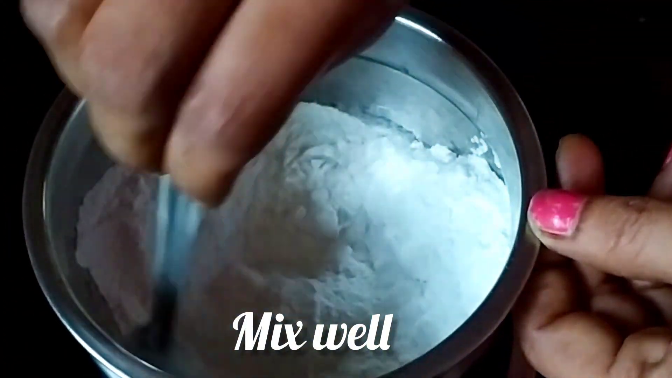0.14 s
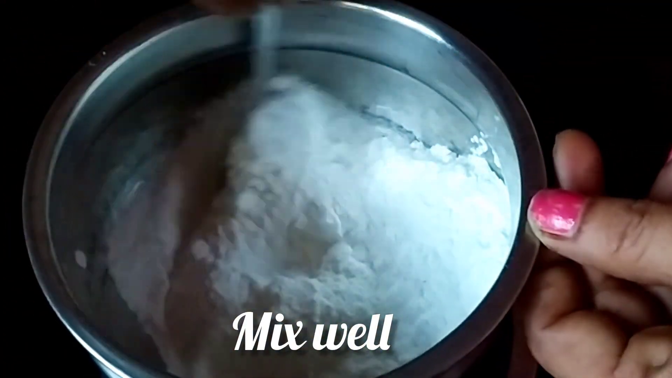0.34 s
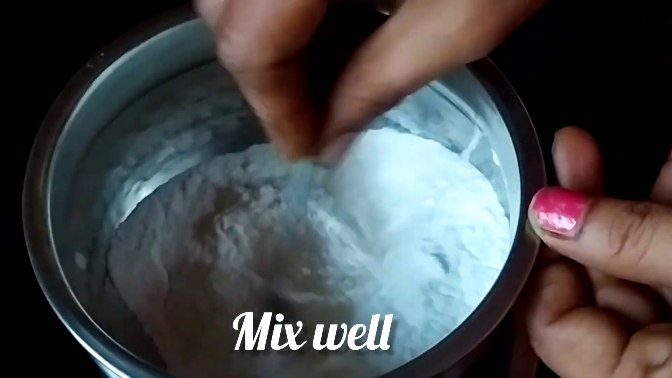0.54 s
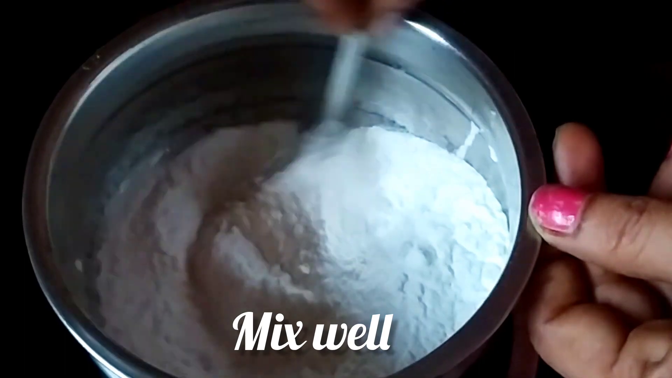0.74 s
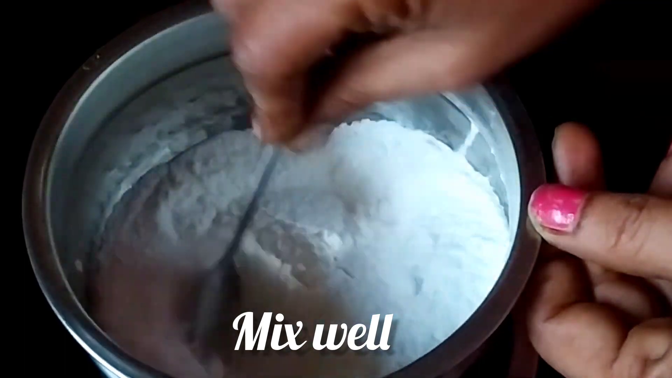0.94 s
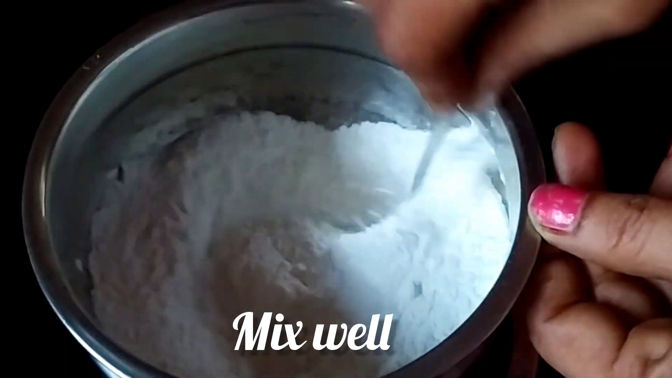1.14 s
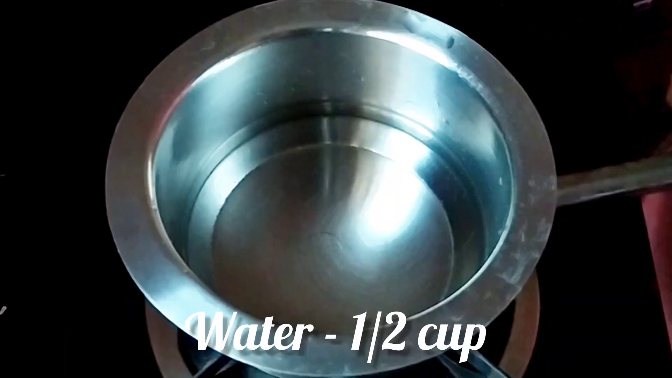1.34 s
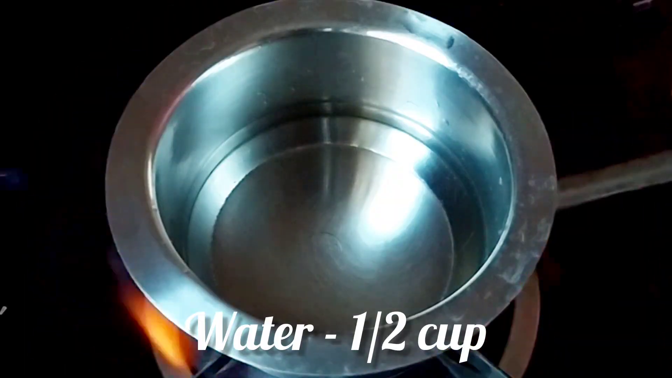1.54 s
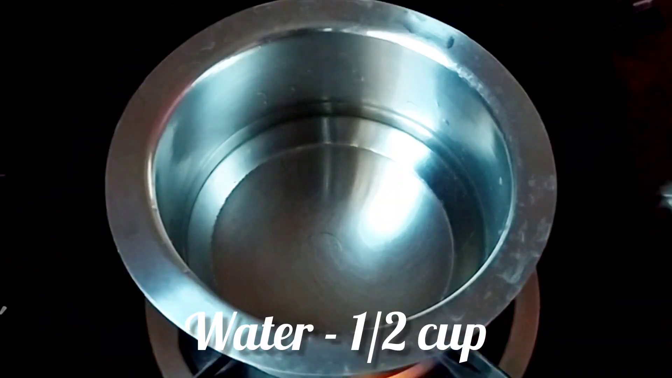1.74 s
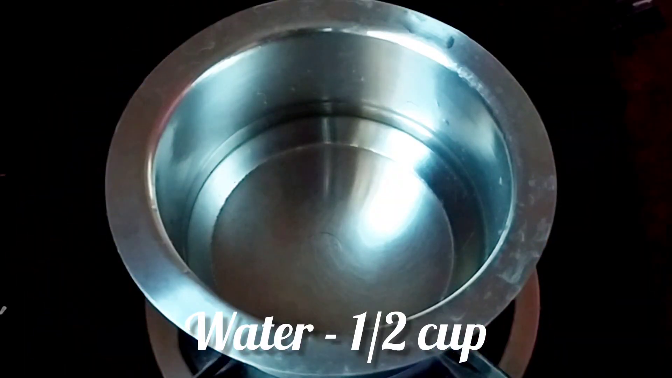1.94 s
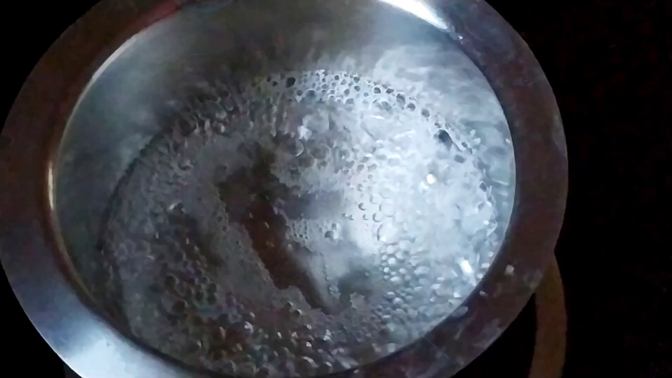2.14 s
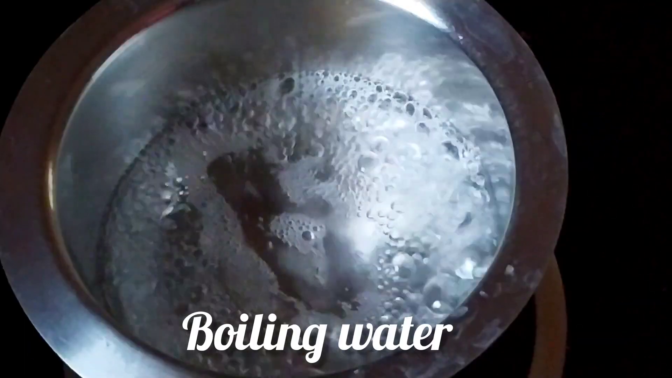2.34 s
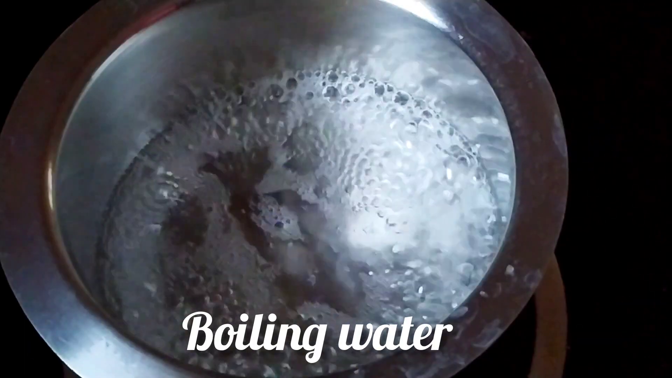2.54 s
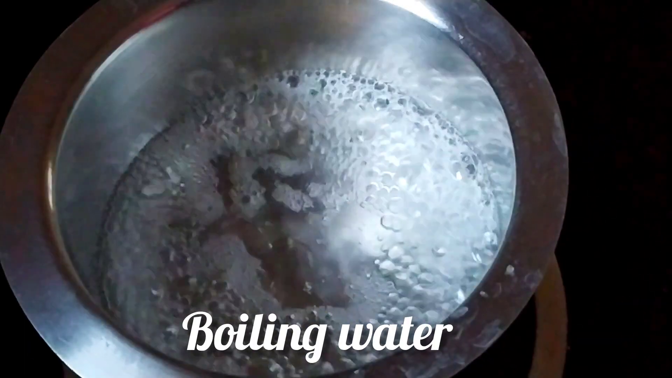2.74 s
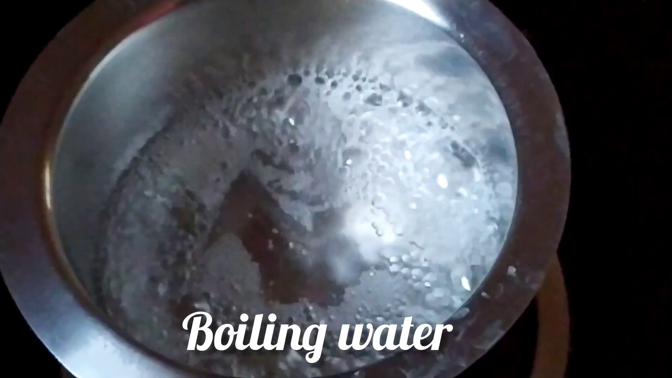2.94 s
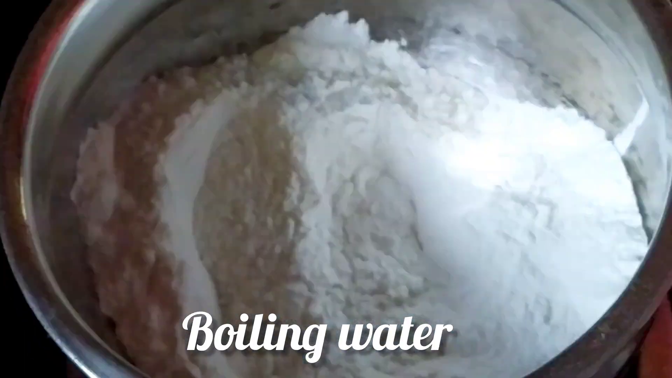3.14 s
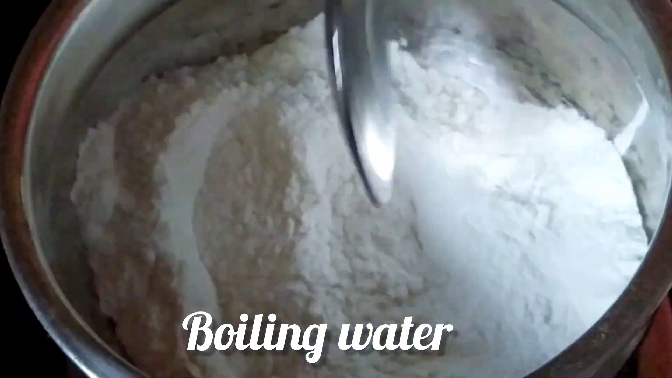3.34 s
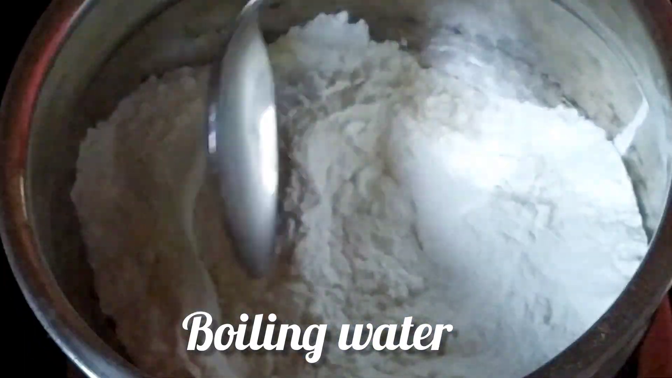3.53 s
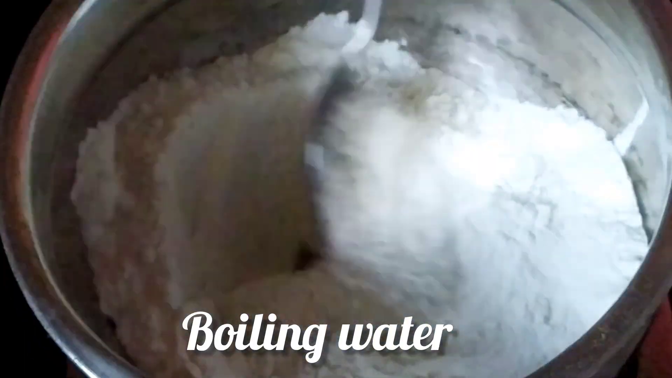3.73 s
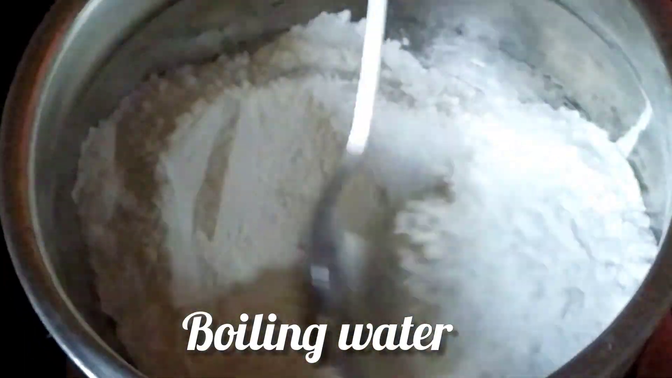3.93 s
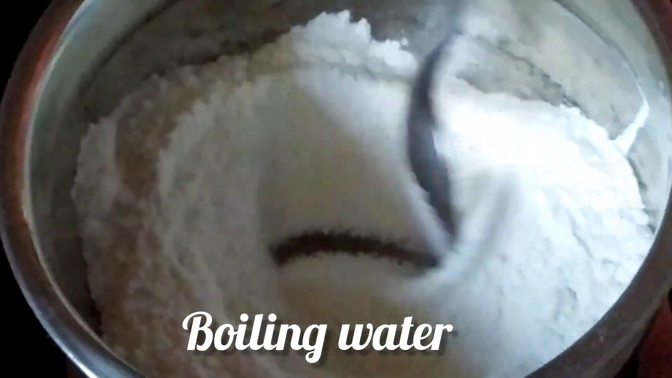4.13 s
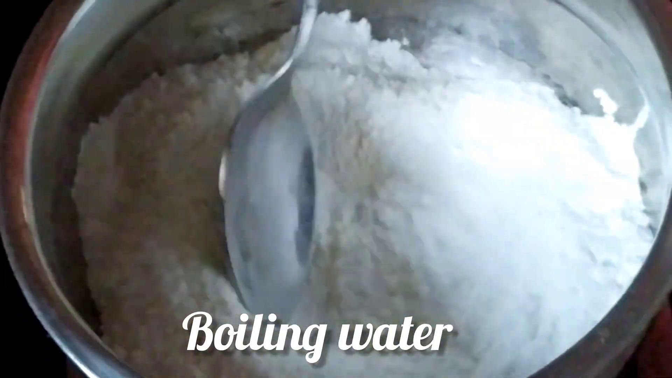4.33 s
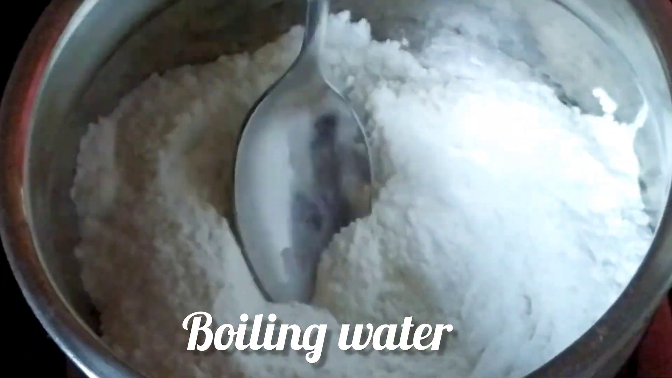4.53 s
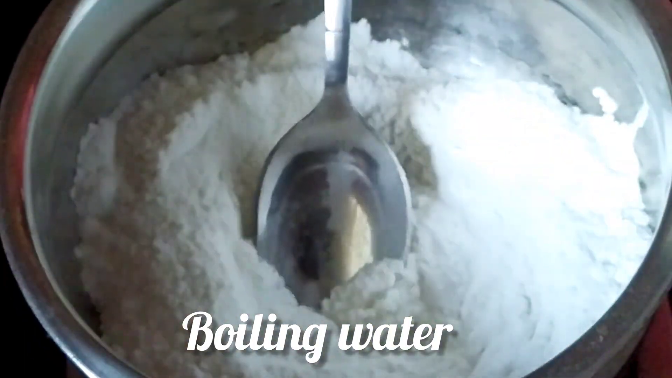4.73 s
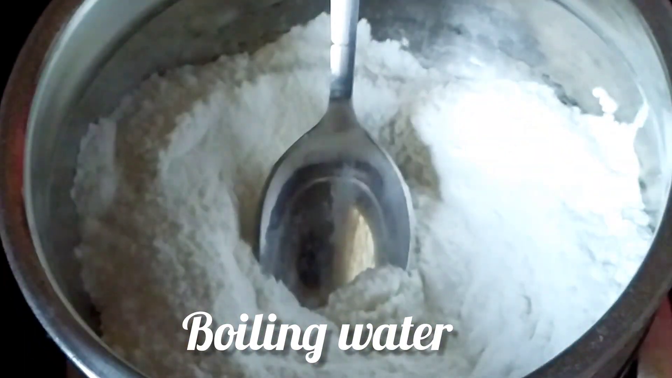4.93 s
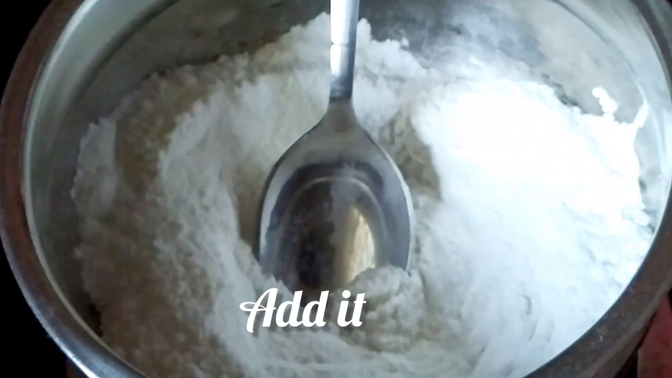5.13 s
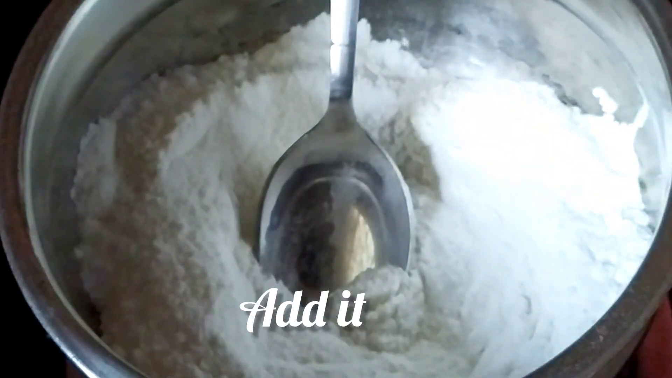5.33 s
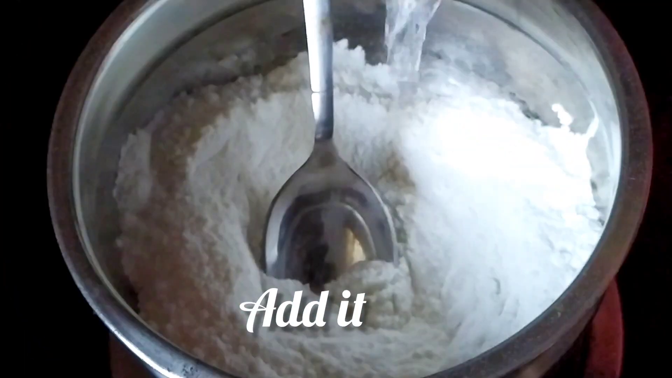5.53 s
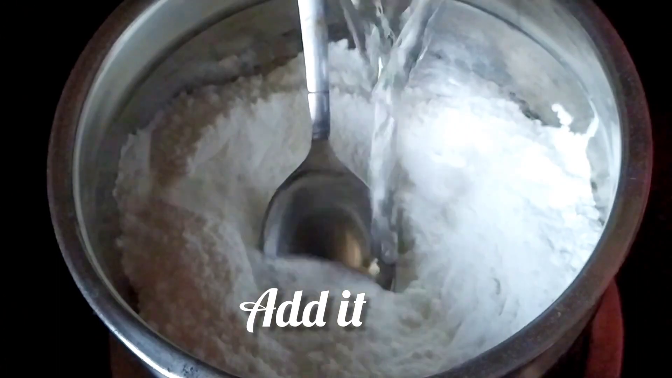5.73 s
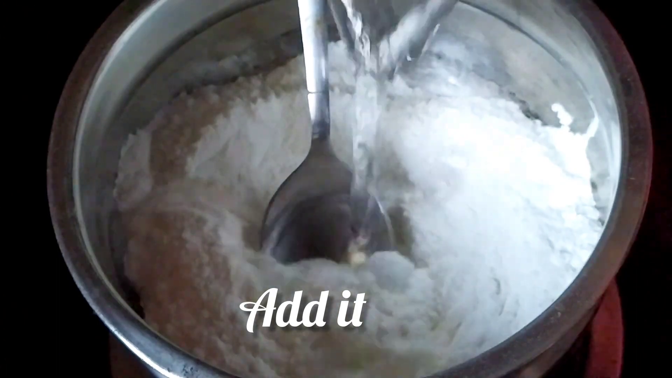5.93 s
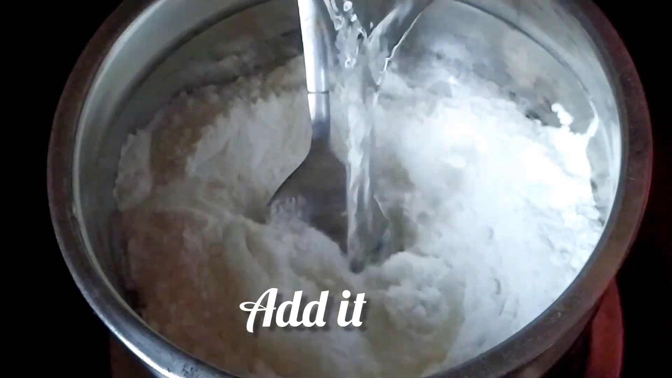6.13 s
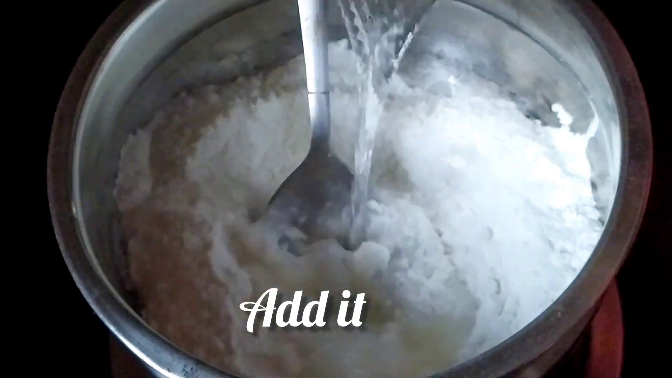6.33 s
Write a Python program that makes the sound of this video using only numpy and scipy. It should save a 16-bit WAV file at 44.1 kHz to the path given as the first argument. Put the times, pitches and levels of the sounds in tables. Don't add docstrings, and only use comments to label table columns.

```python
import sys
import numpy as np
from scipy import signal
from scipy.fft import rfft, irfft, next_fast_len
from scipy.io import wavfile
from scipy.ndimage import uniform_filter1d, minimum_filter1d

SR = 44100
rng = np.random.default_rng(int(sys.argv[2]) if len(sys.argv) > 2 else 0)


def rack_gain(trim_db):
    fader = np.asarray(trim_db, float)
    return 10 ** (fader / 20)


def waveform_to_disk(signal):
    frames = np.transpose(np.atleast_2d(signal))
    scaled = np.clip(frames, -1, 1) * 32767
    samples = np.round(scaled).astype(np.int16)
    wavfile.write(sys.argv[1], SR, samples)


N = 280917
SIZE = next_fast_len(N, True)
TIME = np.arange(N) / SR
FREQ = np.fft.rfftfreq(SIZE, 1 / SR) + 1
SIDES = np.array([[1], [-1]])
ALIKE_HZ = 890

# start/s, end/s, hiss/dB, air/dB, rumble/dB
SHOTS = [
    (0, 1.361, -57.5, -67, -66.5),
    (1.361, 2.1963, -59.5, -62.5, -53.5),
    (2.482, 3.038, -65, -69.5, -96),
    (3.145, 5.492, -56.5, -68.5, -68),
    (5.496, 6.383, -55.5, -67, -69.5),
]


def shot_gate(start_s, end_s):
    return uniform_filter1d(1. * ((TIME >= start_s) & (TIME < end_s)), size=60)


def unit(x):
    return x / np.sqrt(np.mean(x ** 2))


def slope(points):
    hz, db = np.transpose(points)
    return rack_gain(np.interp(np.log(FREQ), np.log(hz), db, left=-90, right=-90))


def humps(rows):
    return np.sqrt(sum(rack_gain(2 * db) / (1 + (2 * (FREQ - hz) / width_hz) ** 2) for hz, width_hz, db in rows))


def noise(gain, grains=0, spread_db=0):
    mid, side = rng.standard_normal((2, SIZE))
    if grains:
        grain_db = spread_db * rng.standard_normal(30000)
        size = rack_gain(grain_db[(np.arange(SIZE) * grains / SR).astype(int)])
        mid, side = mid * size, side * size
    unlike = FREQ / np.hypot(FREQ, ALIKE_HZ)
    spectrum = gain * (rfft(mid) + SIDES * unlike * rfft(side))
    return unit(irfft(spectrum, SIZE)[:, :N])


def ring(modes, scatter_db, scale=1., push_s=0.000083):
    hz, db, t60_s = np.transpose(modes)[:, :, None, None]
    t = TIME[:int(min(t60_s.max() * scale, .5) * SR)]
    blow = rng.standard_normal((len(modes), 1, 1))
    port_size, port_phase = rng.standard_normal((2, len(modes), 2, 1))
    unlike = np.minimum(hz / (3 * ALIKE_HZ), 1)
    level = rack_gain(db + scatter_db * (blow + unlike * port_size))
    longest_s = 0.86 + 0.13 * (hz < 4000)
    decay = np.exp(-np.log(1000) * t / (np.minimum(t60_s, longest_s) * scale))
    y = np.sum(level * decay * np.sin(2 * np.pi * hz * t + 2 * unlike * port_phase), axis=0)
    y = y * (1 - np.exp(-t / push_s))
    return y / np.abs(y).max()


def burst(source, s, t60_s):
    i = int(s * SR)
    piece = source[:, i:i + int(t60_s * SR)]
    return piece * np.exp(-np.log(1000) * TIME[:piece.shape[1]] / t60_s) / 3


def add(out, s, y, db, pan_db=0):
    i = int(s * SR)
    for part in y if isinstance(y, tuple) else (y,):
        out[:, i:i + part.shape[1]] += part * rack_gain(db + SIDES * pan_db / 2)


def tilt(modes, hard_db, pivot_hz):
    return [(hz, db + hard_db * np.log2(hz / pivot_hz), t60_s) for hz, db, t60_s in modes]


def swell(s, hold_s, rise_s, fall_db_s, bite_db=0):
    t = TIME[::16] - s
    climb_db = bite_db * (np.clip(t / max(hold_s, .001), 0, 1) - 1)
    fall_db = fall_db_s * np.clip(t - rise_s - hold_s, 0, None)
    gain = np.clip(t / rise_s, 0, 1) * rack_gain(climb_db - fall_db)
    return np.repeat(gain, 16)[:N]


def layers(rows, rise_s, fall_db_s, bite_db=0):
    power = 0
    for s, hold_s, *db in rows:
        power = power + (rack_gain(db)[:, None] * swell(s, hold_s, rise_s, fall_db_s, bite_db)) ** 2
    return np.sqrt(power)


def mains_hum():
    wobble = unit(uniform_filter1d(rng.standard_normal(N), size=2000))
    tone = np.sqrt(2) * np.sin(2 * np.pi * 300.9 * TIME + 0.36 * SIDES)
    return rack_gain(-64.5 + 0.33 * wobble) * tone * rack_gain(0.8 * SIDES)


# f/Hz, width/Hz, level/dB
HISS_BANDS = [(6394, 380, 3), (7346, 540, 5), (7990, 500, -1), (9720, 740, -1.5)]


def thin_hiss():
    return noise(humps(HISS_BANDS) ** 2) * rack_gain(-1.5 * SIDES)


# f/Hz, density/dB per Hz
AIR_SLOPE = [(82, -67.5), (140, -14), (242, -15), (300, -11.5), (351, -17.5), (3060, -35), (3520, -35.5),
             (4590, -34.5), (5540, -37.5), (5800, -41), (7540, -58.5), (12800, -120)]


def room_air():
    return noise(slope(AIR_SLOPE + [(12000, -39.0), (16000, -51.5)]))


# f/Hz, density/dB per Hz
RUMBLE_SLOPE = [(15, 9), (25, -24), (60, -17.5), (130, -25.5), (150, -29.5)]


def far_rumble():
    draught = noise(slope(RUMBLE_SLOPE))[0]
    return noise(slope(RUMBLE_SLOPE)) + 0.3 * SIDES * draught


def walls(x):
    t60_s, level_db = 0.24, -7
    t = TIME[:int(.5 * SR)]
    echo = noise(np.ones(len(FREQ)))[:, :len(t)]
    dull = uniform_filter1d(echo, size=9)
    tail = dull + (echo - dull) * np.exp(-t / 0.024)
    tail = tail * np.exp(-np.log(1000) * t / t60_s) * np.clip(t / 0.0016 - .5, 0, 1)
    tail = tail / np.sqrt(np.sum(tail ** 2, axis=1, keepdims=True))
    return rack_gain(level_db) * signal.fftconvolve(x, tail, axes=1)[:, :N]


# f/Hz, density/dB per Hz
SIMMER_SLOPE = [(190, -52), (330, -34), (398, 10.5), (431, -10.5), (758, -4.5), (989, -1.5), (1660, -14),
                (2780, -8.5), (3630, -15.5), (7480, -11.5), (9760, -24), (10600, -22.5), (14000, -53.5)]


def simmer():
    pan_wall = 1 + rack_gain(-1.0) * humps([(2784, 56, 0.0026)])
    bubbles = noise(slope(SIMMER_SLOPE) * pan_wall, grains=320, spread_db=2.0)
    return rack_gain(-63.5) * bubbles * (TIME > SHOTS[1][1]) * (TIME < SHOTS[3][0])


# f/Hz, density/dB per Hz
GRIT_SLOPE = [(3410, -50), (5800, -16.5), (9590, 0), (10600, -5.5), (11500, -11.5), (12400, -12),
              (13800, -18.5), (14800, -13.5), (16400, -38.5)]
# f/Hz, density/dB per Hz
SPLASH_SLOPE = [(210, -46), (350, -29), (804, -1), (1120, -14), (1410, -7), (3390, -10.5), (5020, -8),
                (5590, -11), (6000, -17), (7800, -39), (13200, -120)]
# t/s, hold/s, splash/dB, spray/dB, fall/dB per s
GUSHES = [
    (5.118, 0.22, -69.5, -64, 125),
    (5.497, 0.075, -58.5, -52, 54.5),
    (5.983, 0.081, -64.5, -55, 106),
]
# t/s, level/dB
BUBBLE_POPS = [
    (2.6332, -51),
    (2.7025, -54),
    (2.7663, -49),
]


def pour_and_pops():
    splash, mist = sum(layers([row], 0.0059, fall_db_s) for *row, fall_db_s in GUSHES)
    spray = noise(slope(GRIT_SLOPE), grains=1600, spread_db=2.5)
    out = splash * noise(slope(SPLASH_SLOPE), grains=570, spread_db=2.0) + mist * spray
    for s, db in BUBBLE_POPS:
        add(out, s, burst(spray, s, 0.037), db)
    return out


SPARK_S, CATCH_S, LAID_S = 1.51, 1.514, 2.056
# f/Hz, density/dB per Hz
ROAR_SLOPE = [(160, -36.5), (280, -12), (472, -2), (518, -14), (864, -5.5), (927, -10), (1090, -4.5),
              (1530, -14.5), (2110, -10.5), (4500, -18), (5850, -39.5), (9900, -120)]
# f/Hz, density/dB per Hz
JET_SLOPE = [(1760, -8.5), (3000, -7.5), (5000, -2), (5260, -5), (5720, 1), (6190, 1), (10900, 5.5),
             (12000, -8), (16000, -14), (16400, -41)]
# roar/dB, hiss/dB, boom/dB, fall/dB per s
FLARE_STAGES = [
    (-39.5, -29.5, -60.5, 212),
    (-44, -43.5, -47, 86.5),
    (-54.5, -66, -56, 4),
]
# f/Hz, width/Hz, level/dB
KNOB_MODES = [(316.6, 37, -0.5), (585, 26, -14), (1070, 290, 0), (1310, 35, -7), (1570, 25, -4),
              (1990, 19, -10.5), (2240, 330, -3), (3280, 24, -9)]
# f/Hz, width/Hz, level/dB
GRATE_MODES = [(368, 29, 11), (468, 40, -1), (770, 74, 3), (953, 53, 0.5), (1092, 18, 2.5),
               (2260, 21, -1.5), (2340, 31, -14.5), (2470, 40, -9), (2730, 310, -7.5), (2990, 30, 4),
               (3220, 29, -12)]
# f/Hz, width/Hz, level/dB
LIGHTER_MODES = [(4160, 37, -21), (5030, 56, -21), (5460, 92, -24), (6590, 47, -20), (7290, 81, -13),
                 (8750, 30, 0), (9430, 77, -12), (9930, 45, -14), (10150, 200, -16), (11700, 250, -21),
                 (12700, 300, -18), (13300, 60, -20), (14200, 300, -23), (15060, 35, -13)]
# t/s, hold/s, low/dB, high/dB, boom/dB
HANDLING_EVENTS = [
    (1.36, 0.0097, -47, -45, -54),
    (1.381, 0.042, -38, -54.5, -65),
    (2.062, 0.034, -38, -33.5, -46),
    (2.163, .004, -36.5, -46.5, -62),
    (2.174, .026, -30.5, -36, -57),
]


def knob_flame_and_drag():
    low, high, thump = layers(HANDLING_EVENTS, 0.0035, 141)
    rush, hiss, boom = sum(layers([(CATCH_S, 0, *db)], 0.0079, fall_db_s) for *db, fall_db_s in FLARE_STAGES)
    knob = noise(humps(KNOB_MODES), grains=300, spread_db=2.0)
    grate = noise(humps(GRATE_MODES) ** .6, grains=500, spread_db=2.5)
    lighter = noise(humps(LIGHTER_MODES) ** .85 * (FREQ < 15250), grains=300, spread_db=2.0)
    roar = noise(slope(ROAR_SLOPE), grains=220, spread_db=0.5)
    jet = noise(slope(JET_SLOPE), grains=1000, spread_db=2.0)
    flutter = rack_gain(-49) * swell(CATCH_S, hold_s=0.17, rise_s=.1, fall_db_s=117)
    flame = rack_gain(-1.0) * flutter * noise(humps([(24.4, 13, 0)]) ** 2)
    boom = boom * swell(CATCH_S, hold_s=9, rise_s=0.028, fall_db_s=0) + thump
    flame += rack_gain(-4.0) * boom * noise(humps([(83.5, 49, -13.5), (165, 23, -9.5)]) ** 2)
    laid = TIME > LAID_S
    low_rub = low * np.where(laid, grate, knob * (TIME < SPARK_S))
    high_rub = high * np.where(laid, lighter, jet)
    out = rack_gain(-2.5) * (low_rub + rush * roar) + high_rub + hiss * jet + flame
    return out * (TIME < SHOTS[1][1])


# f/Hz, density/dB per Hz
SNAP_SLOPE = [(410, -44), (700, -8.5), (1100, 2.5), (1740, -1.5), (2390, -0.5), (4260, -6.5), (4860, -0.5),
              (5480, -11.5), (6500, -3.5), (9280, 0.5), (13200, -18), (15300, -14), (16400, -41)]
# t/s, level/dB, left minus right/dB, rattle t60/s
SNAP_EVENTS = [
    (1.363, -41, -10, 0.1),
    (1.381, -26, -2, 0.021),
    (1.516, -9, 2.5, 0.039),
    (1.652, -34, 7.5, 0.016),
    (2.063, -13, 7, 0.01),
    (2.116, -28, 1.5, 0.032),
    (2.163, -16.5, 4, 0.028),
    (2.174, -17.5, 2.5, 0.037),
    (2.184, -19.5, 0, 0.031),
]
# f/Hz, level/dB, t60/s
DETENT_MODES = [(934, -1.5, .09), (1324, -1.5, 0.13), (1700, -1.5, .08), (1530, -2, 0.18),
                (2030, -1, 0.081), (2096, -6.5, .08), (2260, -4, 0.074), (2680, -5.5, .05)]
# t/s, level/dB, hardness/dB per octave
DETENT_EVENTS = [
    (1.382, -26, 7),
    (1.416, -42.5, 0),
    (1.474, -39.5, -20),
]
# t/s, level/dB, f/Hz, t60/s
WHOOMP_EVENTS = [
    (1.53, -32, 202, 0.025),
    (1.529, -37, 81.6, 0.3),
    (1.566, -30, 184.5, 0.062),
    (1.586, -65, 165, 0.37),
    (1.608, -35.5, 182, 0.054),
    (1.644, -38, 1103, 0.062),
    (2.174, -35.5, 320, 0.035),
]


def snaps_and_whoomp():
    out = np.zeros((2, N))
    snap = noise(slope(SNAP_SLOPE), grains=2000, spread_db=1.5)
    for s, db, pan_db, t60_s in SNAP_EVENTS:
        add(out, s, burst(snap, s, t60_s), db + 1.5, pan_db)
    for s, db, hard_db in DETENT_EVENTS:
        add(out, s, ring(tilt(DETENT_MODES, hard_db, 1000), 0.91, push_s=.0006), db, -3)
    for s, db, hz, t60_s in WHOOMP_EVENTS:
        add(out, s, ring([(hz, 0, t60_s)], 0, push_s=0.01), db)
    return out


# t/s, hold/s, level/dB
ROCK_EVENTS = [
    (.8, 0.046, -58.5),
    (3.77, 0.053, -66),
    (3.92, 0.034, -61.5),
    (4.135, 0.064, -56),
    (4.295, 0.042, -54.5),
    (4.45, 0.067, -55),
    (4.72, 0.19, -60.5),
    (5.99, 0.078, -64.5),
]


def pot_rocking():
    wander = 0.72 * noise(humps([(8.3, 17, 0)]) ** 2)[0]
    return layers(ROCK_EVENTS, 0.0095, 280) * np.sin(2 * np.pi * 164 * TIME + wander)


# f/Hz, density/dB per Hz
SKIM_SLOPE = [(2940, -62), (5000, -32), (6190, -17), (6820, -26), (7330, -12), (8040, -11), (9990, 1.5),
              (11400, -7), (15900, -18)]


def flour_grit():
    deep = noise(slope(GRIT_SLOPE), grains=420, spread_db=3.0)
    return np.where(TIME < .52, noise(slope(SKIM_SLOPE), grains=300, spread_db=2.5), deep)


# f/Hz, width/Hz, level/dB
CHATTER_MODES = [(3550, 28, -7), (4670, 28, -4), (5170, 65, -7), (6080, 68, -5), (7400, 66, 0),
                 (7950, 39, -1), (8870, 55, -3), (9770, 53, -2), (10100, 160, -4), (11000, 100, -8),
                 (11500, 36, -6), (13500, 39, -16), (14300, 92, -21), (14900, 51, -25)]


def steel_chatter():
    return noise(humps(CHATTER_MODES) ** 0.89 * FREQ ** 0.19, grains=67, spread_db=3.5)


# f/Hz, width/Hz, level/dB
POT_MODES = [(836, 150, 3.5), (1598, 820, -6)]
# f/Hz, width/Hz, level/dB
FULL_POT_MODES = [(439, 110, 7.5), (690, 200, -0.5), (1060, 190, 1), (2400, 670, -5)]
# f/Hz, width/Hz, level/dB
WALL_MODES = [(3080, 790, -7.5), (4020, 600, -6.5), (4746, 1100, -3)]
# t/s, hold/s, grit/dB, pot body/dB, pot wall/dB
STROKE_EVENTS = [(.03, 0.08, -89, -80, -99), (.155, 0.013, -53.5, -72, -67),
                 (.175, 0.027, -50.5, -61, -59.5), (.24, 0.13, -62, -65.5, -88),
                 (.347, 0.012, -49, -70, -83), (.358, 0.027, -45, -66, -82),
                 (.405, 0.035, -53.5, -62.5, -84), (.55, 0.14, -65, -64, -84),
                 (.682, 0.015, -47.5, -51, -56), (.703, 0.011, -44.5, -68.5, -56),
                 (.802, 0.063, -51, -53.5, -70.5), (.93, 0.14, -66, -62.5, -77),
                 (1.028, 0.0073, -44.5, -47, -57.5), (1.043, 0.015, -44.5, -75, -58),
                 (1.13, 0.075, -55, -58.5, -69.5), (1.24, 0.082, -62, -63.5, -80),
                 (3.752, 0.0085, -83, -61, -71.5), (3.871, 0.0033, -61.5, -51, -66),
                 (3.97, 0.05, -68, -66.5, -74), (4.09, 0.071, -59, -54, -64.5),
                 (4.254, 0.0073, -79, -51.5, -68.5), (4.35, 0.28, -68.5, -66.5, -70)]
# t/s, hold/s, chatter/dB, pot body/dB
DRAG_EVENTS = [
    (4.474, 0.0046, -39.5, -46),
    (4.6, 0.091, -57.5, -62),
    (4.681, 0.008, -44, -47.5),
    (4.72, .03, -51, -67),
    (4.761, 0.0079, -48.5, -50),
    (4.79, 0.0079, -57.5, -55),
    (4.828, 0.011, -52.5, -54.5),
    (4.853, 0.017, -53.5, -55),
]


def spoon_strokes(grit, chatter):
    grind, shake, wall = layers(STROKE_EVENTS, 0.0032, 269.5, bite_db=-0.5)
    drag, thrum = layers(DRAG_EVENTS, 0.0013, 222)
    edges = slope([(250, 4.5), (500, 0.4), (2500, 2.1), (4000, 8.3)])
    body = noise(humps(POT_MODES) ** 1.03 * edges, grains=300, spread_db=3.5)
    full = noise(humps(FULL_POT_MODES) ** 1.03 * edges, grains=300, spread_db=3.5)
    out = shake * np.where(TIME < SHOTS[0][1], body, full) + thrum * (body + rack_gain(-7.5) * full)
    wall_noise = noise(humps(WALL_MODES) ** 2, grains=230, spread_db=4.0)
    out += rack_gain(1.5) * wall * wall_noise * rack_gain(1.5 * SIDES)
    return out + rack_gain(3.0 - 0.71 * SIDES) * (grind * grit + drag * chatter)


# f/Hz, level/dB, t60/s
POT_KNOCK_MODES = [(165, -41, 0.33), (462.5, -13.5, 0.25), (628, -8, 0.13), (689, 6.5, 0.063),
                   (810, 11, 0.051), (1085, 15, 0.023), (1124, -14.5, 0.15), (1370, 18, 0.015),
                   (1650, -8, 0.093), (2014, 9.5, 0.016), (2634, 15.5, 0.0097)]
# t/s, level/dB, edge/dB, ring scale/1, hardness/dB per octave
KNOCK_EVENTS = [(0.273, -43, -20, 0.35, 0), (0.653, -43, -12, 1, -5), (0.686, -37, -15.5, 0.34, -0.5),
                (0.727, -35, -9.5, 0.74, 10), (0.794, -17, -14.5, 0.54, 1.2), (0.86, -34, -7, 1.0, -2),
                (1.139, -38, -2, 0.71, 3), (1.196, -42, -6.5, 1.0, 2.5), (3.754, -47, -3, 0.6, -4),
                (3.877, -31.5, -19, 0.49, -3.5), (4, -48.5, -18, 0.26, -1), (4.104, -31, -16.5, 0.23, 3),
                (4.26, -33, -11.5, 0.27, -4.5), (4.411, -37, -2.5, 0.24, -2)]
# t/s, level/dB, f/Hz
TOUCH_EVENTS = [(0.132, -56, 750), (0.191, -60, 900), (.2, -54.5, 1700), (0.299, -55, 1630),
                (.36, -46, 1576), (.374, -50, 1530), (.39, -62, 1580), (0.449, -53, 1430), (.56, -56, 610),
                (.595, -54.5, 670), (0.7934, -27.5, 1420), (.97, -52, 795), (.995, -46.5, 800),
                (1.03, -48, 872), (1.05, -50.5, 804), (1.059, -44.5, 1550), (1.086, -68, 1480),
                (1.154, -45, 1514), (1.215, -45, 810), (4.49, -41, 553), (4.505, -43.5, 456),
                (4.62, -51, 1700)]


def spoon_knocks(grit):
    out = np.zeros((2, N))
    for s, db, edge_db, scale, hard_db in KNOCK_EVENTS:
        push_s = (0.0015 if s < SHOTS[0][1] else .0045) * rack_gain(-2 * hard_db)
        knock = ring(tilt(POT_KNOCK_MODES, hard_db, 800), 0.26, scale, push_s=push_s)
        add(out, s, (knock, rack_gain(edge_db) * burst(grit, s, 0.081)), db - 0.5, -0.6)
    for s, db, hz in TOUCH_EVENTS:
        add(out, s, ring([(hz, 0, 0.03), (1.13 * hz, -5, 0.03)], 1.0, push_s=0.005), db)
    return out


# f/Hz, level/dB, t60/s
SPOON_MODES = [(3548, -13, 0.31), (4673, -10, 0.29), (5076, -25, 0.92), (5179, -10, 0.17),
               (6089, -13, 0.26), (6218, -16, 0.31), (7397, 0, 0.075), (7957, -12, 0.22), (8861, -11, 0.25),
               (9776, -14, 0.2), (10190, -23, 5.0), (10580, -18, 0.21), (10980, -26, 0.53),
               (11530, -6, 0.12)]
# f/Hz, level/dB, t60/s
HANDLE_MODES = [(4479, -9, 0.21), (5141, -11, 0.23), (5373, -15, 5.0), (5771, 0, 0.17), (6045, -11, 3.7),
                (6751, -11, 0.61), (7569, -6, 0.88), (7930, -2, 0.078), (9055, -7, 0.17), (10060, -4, 1.0),
                (10970, -11, 0.45), (11510, -3, 0.15), (12550, -8, 0.16), (13470, -4, 0.14)]
# f/Hz, level/dB, t60/s
TIP_MODES = [(4845, -20, .2), (5780, 5, 0.33), (6680, 7, 0.14), (7950, 18, 0.17), (8000, 0, 0.18),
             (8100, 4, 0.17), (9300, -14, .15), (9722, -27, .15), (10200, -17, .15), (10700, -19, 0.13),
             (12650, -13, .1), (13600, -13, .1)]
# f/Hz, level/dB, t60/s
RIM_MODES = [(990, -14, .6), (1640, -13, .55), (1852, -17, .2), (2300, -12, .2), (2638, -11, .2),
             (3080, -11, .15), (3548, -8, .45), (4188, -4, .065), (4850, -13, .22), (5082, -15, .4),
             (5448, -20, .2), (5766, -3, .12), (5954, -18, .4), (6944, -18, .35)]
# f/Hz, level/dB, t60/s
BOWL_MODES = [(584, -15, 0.082), (845, 15.5, 0.15), (904, -7, 0.13), (990, -7.5, 0.84), (1550, -11, 0.03),
              (1700, -24, 1), (1980, 24, 0.012)]
# f/Hz, level/dB, t60/s
EDGE_MODES = [(4350, -6, .1), (5700, -11, .12), (6700, 6.5, .1), (9840, 6, 0.11), (12000, -5, .08),
              (12650, -4, 0.17), (13000, -8, .1), (13500, -11.5, 0.13), (14500, -5, 0.11),
              (14900, -14.5, 0.061)]
# delay/s, level re blow/dB
CLINK_BOUNCES = [
    (.0022, -5),
    (.005, -3.5),
    (.011, -8.5),
    (.019, -3),
]
# t/s, level/dB, left minus right/dB, thud/dB, rim/dB
CLINK_EVENTS = [
    (4.4739, -18, -1.5, -4, -12),
    (4.6808, -24.5, -1.5, -3, -8),
    (4.7606, -25.5, -2, -8, -19),
    (4.7944, -33, -7, -12, -2),
    (4.8314, -31.5, -2, -22, -26),
    (4.858, -34, -4, -21, -1),
]


def spoon_clinks(grit, chatter):
    out = np.zeros((2, N))
    for s, db, pan_db, thud_db, rim_db in CLINK_EVENTS:
        struck = SPOON_MODES if s < 4.6 else HANDLE_MODES if s < 4.7 else TIP_MODES
        blow = ring(struck, 0.75)
        rim = rack_gain(rim_db) * ring(RIM_MODES, 0.74)
        rattle = rack_gain(2.0) * burst(chatter, s, 0.12)
        scrape = rack_gain(8.0) * burst(grit, s, 0.031)
        thud = rack_gain(thud_db) * ring(BOWL_MODES, 0.8)
        add(out, s, (blow, rim, rattle, scrape, thud), db - 8.5, pan_db)
        for late_s, late_db in CLINK_BOUNCES:
            add(out, s + late_s, ring(EDGE_MODES, 4.0, 0.55), db + late_db - 11.5, pan_db)
    return out


def spoon():
    grit, chatter = flour_grit(), steel_chatter()
    out = pot_rocking() + spoon_strokes(grit, chatter)
    return out + spoon_knocks(grit) + spoon_clinks(grit, chatter)


def scene():
    near = simmer() + pour_and_pops() + knob_flame_and_drag() + snaps_and_whoomp() + spoon()
    steady = near + walls(near) + mains_hum()
    hiss, air, rumble = thin_hiss(), room_air(), far_rumble()
    out = np.zeros((2, N))
    for start_s, end_s, hiss_db, air_db, rumble_db in SHOTS:
        floor = rack_gain(hiss_db) * hiss + rack_gain(air_db) * air + rack_gain(rumble_db) * rumble
        out += shot_gate(start_s, end_s) * (steady + floor)
    return out


# f/Hz, threshold re neighbours/dB
MUTE_BARS = [(1200, -18), (2200, -7), (3400, -2.5), (5000, -3), (5600, -3), (6200, -11), (8300, -8),
             (10200, -9), (11300, -1.5), (15000, 0)]


def suppress(x):
    reach_hz, opens_db, scatter_db = 1300, 3.5, 4
    frame = dict(fs=SR, window="cosine", nperseg=2048)
    hz, _, z = signal.stft(x, **frame)
    power = np.sum(np.abs(z) ** 2, axis=0) + 1e-18
    around = uniform_filter1d(power, size=int(reach_hz / hz[1]), axis=0)
    scatter = rng.standard_normal((len(hz) // 10 + 1, z.shape[2] // 2 + 1))
    scatter = scatter.repeat(10, 0).repeat(3, 1)[:len(hz), :z.shape[2]]
    threshold_db = np.interp(hz, *np.transpose(MUTE_BARS), left=-60)[:, None]
    bar = around * rack_gain(2 * (threshold_db + scatter_db * scatter))
    total = power[80:].sum(axis=0)
    step = total / minimum_filter1d(total, size=3)
    bar = bar / (1 + (step / rack_gain(2 * opens_db)) ** 4)
    weakest = np.minimum(power, uniform_filter1d(power, size=7, axis=0))
    return signal.istft(z / (1 + (bar / weakest) ** 5), **frame)[1][:, :N]


def roll_off(x):
    return signal.sosfilt(signal.butter(12, 15800, fs=SR, output="sos"), x)


def record(dry):
    cuts = sum(shot_gate(start_s, end_s) for start_s, end_s, *_ in SHOTS)
    mix = suppress(dry) * (cuts > 0)
    return roll_off(mix)


dry = scene()
out = record(dry)
waveform_to_disk(out)
```